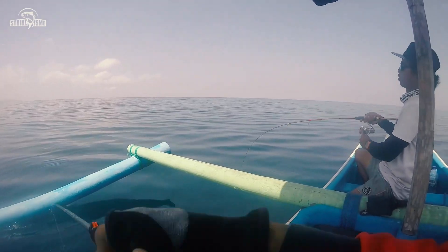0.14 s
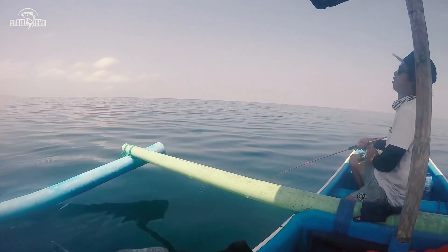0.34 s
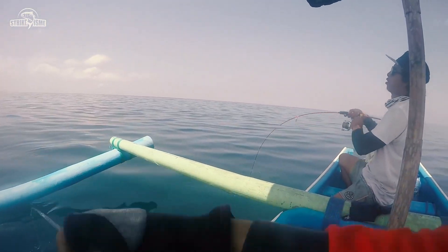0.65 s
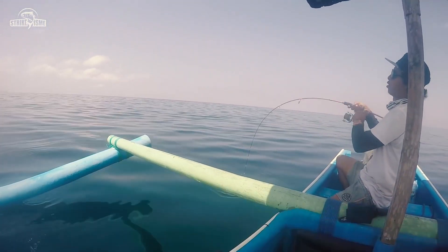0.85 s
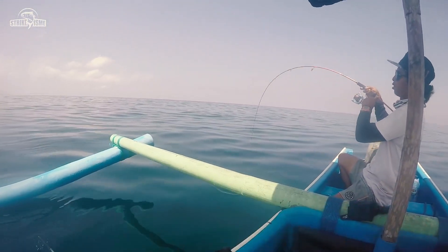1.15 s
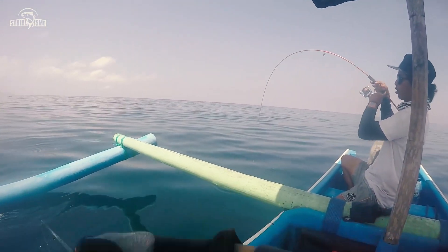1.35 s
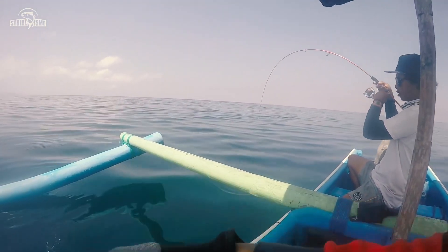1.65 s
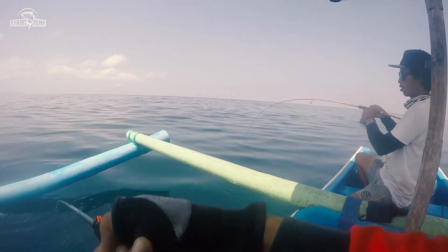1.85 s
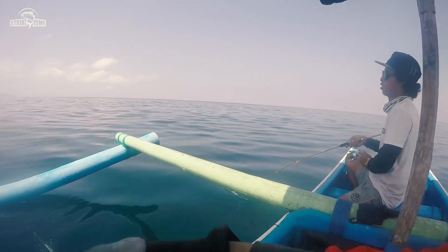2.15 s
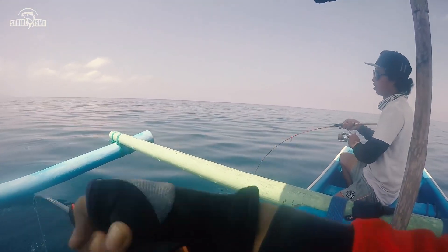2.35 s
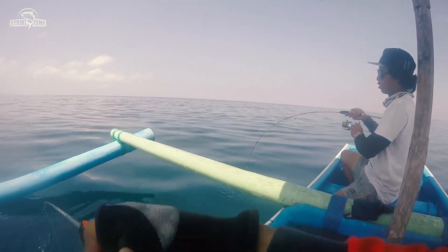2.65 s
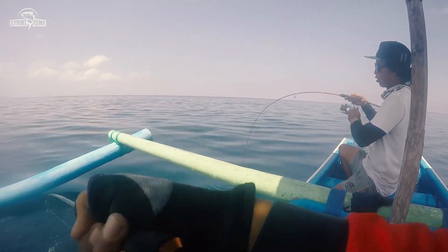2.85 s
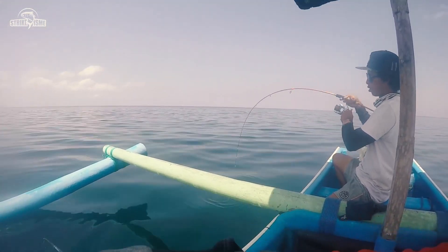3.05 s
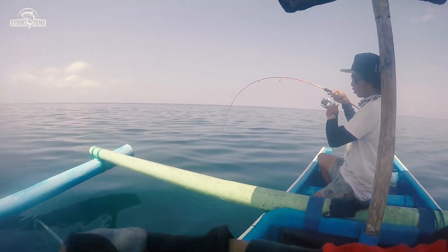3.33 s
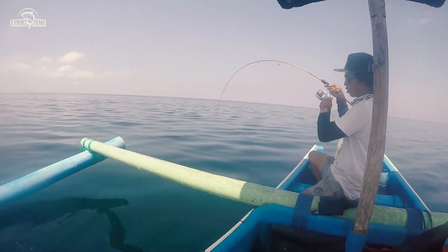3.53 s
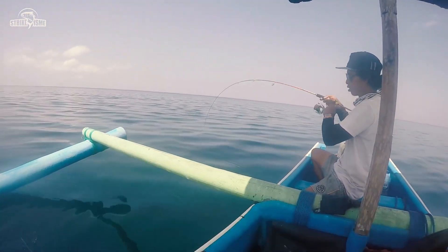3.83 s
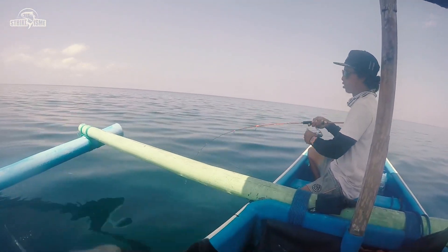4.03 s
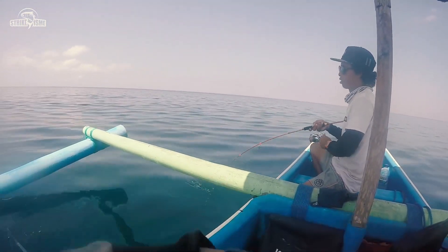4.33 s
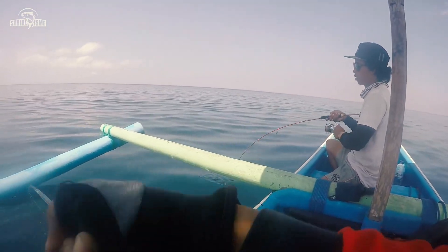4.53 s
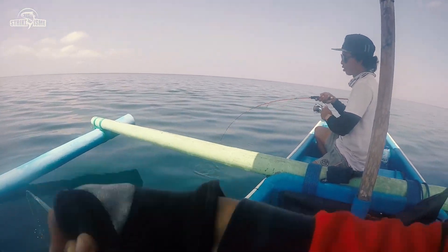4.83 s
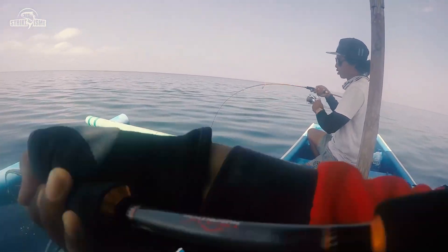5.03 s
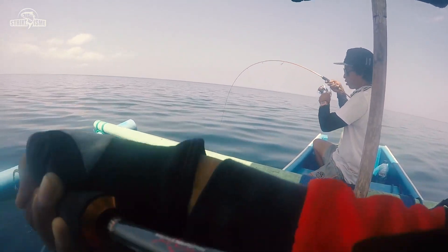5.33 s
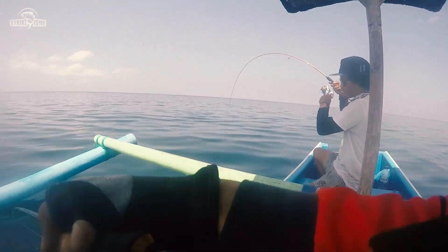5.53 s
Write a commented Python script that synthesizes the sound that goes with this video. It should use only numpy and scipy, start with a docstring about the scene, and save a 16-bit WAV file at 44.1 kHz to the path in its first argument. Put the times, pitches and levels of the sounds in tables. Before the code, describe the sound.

Close, rough outdoor sound from a boat: a reel's gears whine continuously in short cranked surges, labouring low then speeding up in pitch. Deep wind buffets the microphone over a soft sea bed. Wavelets froth and plop at the hull, mostly in the second half, with tiny high clicks and hiss of running line. At about 5.4 seconds a single sharp, woody knock with a deep thump and brief rattle ducks everything.

```python
"""A small outrigger boat on a calm sea, where an angler winds a spinning reel.
The gears whine as rough harmonics, surging with each rotor turn and each push of the crank.
Wind is slow and fast shaped noise; wavelets froth with ringing bubbles, and air pockets plop at the hull.
The reel's drag clicks in three runs of tiny pings with hissing line.
Late on, one hard knock rings the boat's modes, overloads the input and ducks the level."""
import sys
import numpy as np
from scipy import signal
from scipy.fft import rfft, irfft
from scipy.io import wavfile
from scipy.ndimage import uniform_filter1d

SR = 44100
rng = np.random.default_rng(int(sys.argv[2]) if len(sys.argv) > 2 else 0)


def persist_wave(psi):
    """Save psi, clipped to +-1, as 16-bit WAV."""
    counts = np.round(np.clip(psi, -1, 1) * 32767).astype(np.int16)
    wavfile.write(sys.argv[1], SR, np.atleast_2d(counts).T)


N = 250488
TIME = np.arange(N) / SR  # s

# Table levels are balances within each layer; the trims in its function finish the mix.
# Noise spectra are shapes only, each brought to rms 1 before its level is set.

# Harmonics of the gear mesh, from the first up: level_db
MESH_DB = [1.5, -13.5, -25, -40]
# How the reel's housing colours the whine: freq_hz, level_db
HOUSING = [(1800, 6.5), (2600, 1), (3300, 5.5), (3700, 0.5), (4200, -3), (4800, 2), (5300, -4.5),
           (6000, 3.5), (6600, 5.5), (7500, -1.5), (12000, -46)]
# Turns of the crank: mid_push_s, load_pitch_hz, after_push_pitch_hz, rotor_speed_hz,
# pitch_swing_share (per rotor turn), level_db, loudest_s (after mid-push)
CRANKS = [(-0.017, 2700, 2600, 22.4, 0.18, -35.5, 0.024), (0.291, 2910.0, 3070.0, 24.7, 0.16, -37.0, 0.008),
          (0.555, 2380.0, 2780.0, 22.6, 0.15, -37.5, -0.004), (0.832, 2150, 2980, 22, 0.14, -37.0, 0.004),
          (1.089, 2600.0, 3040.0, 24.2, 0.16, -34.5, 0.016),
          (1.392, 2870.0, 2950.0, 23.0, 0.15, -35.0, -0.004),
          (1.654, 2640.0, 3080.0, 23.9, 0.15, -37.5, 0.008),
          (1.916, 2450.0, 3160.0, 22.2, 0.16, -40.0, 0.008),
          (2.179, 2230.0, 3230.0, 22.7, 0.13, -38.0, 0.016),
          (2.448, 2130, 3090.0, 21.3, 0.16, -37.5, -0.004),
          (2.715, 2350.0, 3390.0, 23.5, 0.12, -39.5, 0.012),
          (2.969, 2330.0, 2950.0, 22.6, 0.18, -36.5, 0.028),
          (3.229, 2660.0, 3180.0, 23.9, 0.12, -36.5, 0.012),
          (3.493, 2150.0, 2870.0, 22.2, 0.16, -38.5, 0.016),
          (3.8, 2620.0, 3090.0, 25.0, 0.13, -37.5, -0.004),
          (4.029, 2270.0, 3190.0, 25.3, 0.15, -34.5, 0.02), (4.349, 2350, 3150, 22.4, 0.16, -36.5, -0.004),
          (4.613, 2060.0, 3170.0, 23.4, 0.12, -34.5, 0.004),
          (4.878, 2360.0, 2880.0, 22.6, 0.15, -36.0, -0.008),
          (5.16, 2220, 3050.0, 21.5, 0.13, -37.0, 0.008), (5.418, 2690.0, 2980.0, 23.2, 0.14, -39.5, 0.0),
          (5.703, 2060.0, 2810.0, 21.0, 0.17, -38.5, 0.008)]
# Rasp of the gear teeth and bearings: freq_hz, level_db_per_hz
RASP = [(1200, -32), (1850, -15), (2250, -3), (2700, 0), (3050, -3.5), (3600, -12), (4200, -19),
        (5500, -19), (7500, -23), (11000, -34)]
# Rumble of the large eddies: freq_hz, level_db_per_hz
RUMBLE = [(4, -36), (10, -11.5), (16, 2.5), (23, -7.5), (32, -11.5), (42, -18.5), (60, -38.5), (100, -50)]
# Buffeting at the microphone port: freq_hz, level_db_per_hz
BUFFET = [(35, -18), (60, 8), (80, 2), (120, -4), (180, -12), (260, -23), (450, -26), (1200, -34.5)]
# Slowly changing breeze at the microphone: time_s, rumble_db, buffet_db
BREEZE = [(0, -20, -38.5), (.6, -25.5, -45.5), (1.1, -27, -40.5), (2.1, -20.5, -41.5), (2.6, -25.5, -45.5),
          (3.2, -19.5, -40.5), (3.75, -22, -37.5), (4.2, -21.5, -40.5), (4.8, -17.5, -36.5),
          (5.25, -28.5, -38.5), (5.68, -21.5, -42)]
# Large slow eddies: peak_s, level_db, half_length_s
GUSTS = [(0.14, -19.5, 0.068), (0.438, -14.5, 0.11), (0.808, -14, 0.056), (1.018, -16, 0.021),
         (1.211, -17, 0.04), (1.585, -15, 0.03), (1.71, -16, 0.071), (2.131, -13.5, 0.026),
         (2.74, -17, 0.071), (3.349, -15, 0.046), (4.49, -16.5, 0.041), (4.708, -20, .08),
         (5.08, -17.5, 0.029)]
# Short puffs into the microphone port: peak_s, level_db
PUFFS = [(.43, -37), (.58, -35.5), (.85, -32), (1.0, -37), (1.221, -32), (1.385, -32.5), (1.645, -36),
         (1.86, -45), (2.415, -39), (2.705, -37), (2.99, -34.5), (3.22, -36), (3.3, -33.5), (3.43, -39),
         (3.8, -36.5), (3.911, -29), (4.03, -31), (4.2, -30.5), (4.87, -38), (5.15, -32.5), (5.36, -28)]
# Open sea all around: freq_hz, level_db_per_hz
SEA = [(100, 8.5), (300, 8.5), (700, 3), (1500, 3), (3000, -10), (5000, -3), (8000, -13.5), (11000, -17.5),
       (15000, -16)]
# Wavelets breaking on the hull: crest_s, level_db, length_s
LAPS = [(0.848, -42, 0.0099), (1.46, -46, .03), (1.652, -44, 0.022), (3, -42.5, 0.018), (3.089, -43, .008),
        (3.237, -35, 0.045), (3.391, -38, .03), (3.6, -42, .04), (3.708, -33.5, 0.037),
        (3.912, -31.5, 0.05), (4.037, -39.5, .02), (4.075, -41, 0.015), (4.176, -33, .032),
        (4.298, -39.5, 0.036), (4.52, -37.5, 0.017), (4.723, -40, 0.038), (4.897, -42, .04),
        (5.017, -35.5, 0.027), (5.168, -40, 0.038), (5.292, -33, 0.022), (5.319, -32, 0.0086)]
# Froth of the wavelets: freq_hz, level_db_per_hz
WASH = [(150, -24), (280, 3), (420, -25.5), (580, 0.5), (800, -0.5), (1050, 4.5), (1300, 1), (1520, -2.5),
        (1850, -4.5), (2600, -16.5), (4000, -10.5), (7000, -83), (14000, -38)]
# Spray of the wavelets: freq_hz, level_db_per_hz
SPRAY = [(1500, 2), (2500, 25), (4200, -22), (6000, -33), (10000, -12.5), (15000, -32)]
# The hull's answer to a wavelet: freq_hz, level_db_per_hz
THUD = [(40, -19), (65, 4), (125, 1), (180, -6), (260, -17), (450, -30)]
# Plops of water at the hull: start_s, level_db, starting_pitch_hz
PLOPS = [(0.436, -37, 1500), (0.448, -33, 1480), (0.844, -47, 402), (0.959, -31.5, 1070), (1.212, -35, 534),
         (1.432, -44.5, 414), (1.636, -53, 1079), (2.243, -31.5, 1430), (2.329, -39.5, 614),
         (2.597, -27.5, 1730), (3.09, -25.5, 553), (3.705, -30.5, 1070), (3.901, -21, 980),
         (4.174, -27, 1082), (4.313, -29, 1540), (4.519, -27.5, 616), (5.136, -28, 1832),
         (5.317, -29, 1340), (5.594, -33, 3170)]
# Line pulled against the drag: start_s, fastest_s, end_s, top_clicks_per_s, halving_s (of the rate), level_db
RUNS = [(0.635, 0.794, 1.77, 71, 0.19, -45.5), (2.332, 2.507, 3.45, 180, 0.07, -47.5),
        (4.442, 4.553, 5.26, 110, 0.07, -48)]
# Ring of the drag's pawl: pitch_hz, level_db
PAWL_MODES = [(8200, -3), (8800, -5), (10100, -8), (11600, -9), (13000, -12)]
# Hiss of the running line: freq_hz, level_db_per_hz
LINE_HISS = [(4000, -6), (7000, 8), (8700, -17), (10000, 17), (12000, -19), (15000, 11)]
# The knock and its rattling rebounds: start_s, force_db
KNOCKS = [(5.3811, -6.5), (5.3888, -36), (5.3925, -31), (5.3967, -29.5), (5.4016, -30.5)]
# Modes of the struck boat and the microphone's mount: pitch_hz, level_db, t60_s
BOAT_MODES = [(114.3, -14, 0.075), (220, -14, 0.05), (335, -1, 0.022), (539, 2.5, 0.033),
              (617.5, 0.5, 0.091), (661, 0.5, 0.062), (1037, 6, 0.025), (1100, 10, 0.017),
              (1195, 12.5, 0.014), (1683, -5.5, 0.05), (1833, 13.5, 0.011), (2130, -11.5, 0.061),
              (2830, 1.5, 0.018), (3940, -22, 0.042), (3840, -4, 0.055), (4390, -10, 0.043),
              (5160, -19, 0.031)]

COAST_HZ, COAST_DB = 2665, -48  # the whine between two pushes of the crank
LOAD_S, RUSH_S, EASE_S = .045, .048, .112  # slowest before mid-push, fastest after it, coasting either side
GRIP_S, GRIP_LEAD_S = .098, .013  # half length of the hand's drive, and its lead on mid-push
SPIN_UP_PER_S = 1.1  # share of speed the rotor gains per second through a push
PUSH_S, SURGE_DB = 0.079, 2.27  # half length of the loud part; level swing either way per rotor turn
RASP_DB, SEA_DB, RIPPLE_DB = -47.5, -51, -55  # middle levels; ripples are the water between wavelets
PUFF_S = 0.018  # half length of a puff
LAP_RISE, LAP_FALL = 0.92, 0.94  # build-up and run-off, as shares of a wavelet's length
EDGE_HZ = 15400  # upper band limit


def gain_of(db):
    """Decibels to amplitude."""
    return 10 ** (np.asarray(db) / 20)


def evened(x):
    """Scales to rms 1."""
    return x / np.sqrt(np.mean(x ** 2) + 1e-20)


def curve(rows, axis=1):
    """One column of a table, joined by straight lines in time."""
    rows = np.asarray(rows)
    return np.interp(TIME, rows[:, 0], rows[:, axis])


def add(mix, s, sound):
    """Mixes a sound in at time s."""
    part = mix[max(round(s * SR), 0):][:len(sound)]
    part += sound[:len(part)]


def coloured(x, points):
    """Gives x a spectrum at rms 1, falling 20 dB per octave outside the table."""
    hz, db = np.transpose(points)
    f = np.fft.rfftfreq(N, 1 / SR) + 1e-3
    octaves_outside = np.maximum(np.log2(f / hz[-1]), 0) + np.maximum(np.log2(hz[0] / f), 0)
    shape_db = np.interp(np.log(f), np.log(hz), db) - 20 * octaves_outside
    return evened(irfft(rfft(x) * gain_of(shape_db), N))


def noise(points):
    """Noise with a given spectrum."""
    return coloured(rng.standard_normal(N), points)


def wander(hz):
    """Slow chance movement up to about a given rate, rms 1."""
    f = np.fft.rfftfreq(N, 1 / SR)
    return evened(irfft(rfft(rng.standard_normal(N)) * np.exp(-(f / hz) ** 2), N))


def swell(s, half_s):
    """A smooth rise and fall of height 1 around time s."""
    return np.exp(-((TIME - s) / half_s) ** 2)


def gear_motion(coast_wobble=0.048, coast_flutter_db=2, push_db=-0.56):
    """Pitch and level of the mesh: each push labours, speeds up and coasts while the rotor swings it."""
    knots = []
    swing, wobble, pushing, power = np.zeros((4, N))
    for s, load_hz, rush_hz, rotor_hz, depth, db, accent_s in CRANKS:
        knots += [(s - EASE_S, COAST_HZ), (s - LOAD_S, load_hz)]
        knots += [(s + RUSH_S, rush_hz), (s + EASE_S, COAST_HZ)]
        near = abs(TIME - s) < 2 * EASE_S
        u = TIME[near] - s
        grip = np.exp(-((u + GRIP_LEAD_S) / GRIP_S) ** 4)
        rotor = grip * np.cos(2 * np.pi * rotor_hz * u * (1 + SPIN_UP_PER_S * u / 2))
        swing[near] += rotor
        wobble[near] += depth * rotor
        pushing[near] += grip
        power[near] += gain_of(db + push_db) ** 2 * np.exp(-2 * ((u - accent_s) / PUSH_S) ** 2)
    coasting = np.clip(1 - pushing, 0, 1)
    mean_hz = curve(sorted(knots))
    wobble = wobble + coast_wobble * coasting * wander(30.36)
    hz = mean_hz + np.maximum(mean_hz, COAST_HZ) * wobble  # the swing stays wide under load
    level_db = 10 * np.log10(power + gain_of(COAST_DB) ** 2)
    return hz, level_db + SURGE_DB * swing + coast_flutter_db * coasting * wander(53)


def reel(jitter=0.01698, flutter_db=6.0, whine_db=1, strain_db_per_octave=10, tooth_rough=0.22):
    """Uneven teeth roughen the harmonics, harsher under load; the boat echoes them and bearings rasp."""
    second_gear, second_db = 1.4, -18  # pitch ratio to the mesh, level
    echo_db, echo_t60, rasp_follow = -9, 0.055, 0.21
    hz, db = gear_motion()
    turns = np.cumsum(hz * (1 + jitter * wander(441))) / SR
    strain = np.log2(COAST_HZ / hz)  # octaves by which the load slows the gears
    whine = np.zeros(N)
    for k, level in enumerate(MESH_DB, 1):
        level = level + np.interp(k * hz, *np.transpose(HOUSING)) + flutter_db * np.tanh(wander(214))
        level = level + strain_db_per_octave * strain * (k > 1)
        # chance in strength and phase spreads fuzzy sidebands around each harmonic
        teeth = 1 + tooth_rough * k * (wander(500) + 1j * wander(500))
        whine += gain_of(level) * (teeth * np.exp(2j * np.pi * k * turns)).real
    # a weaker gear on the same drive flickers at random
    second_level = gain_of(second_db + np.tanh(wander(7.1))) * wander(250)
    whine += second_level * np.cos(2 * np.pi * second_gear * turns)
    whine = gain_of(db + whine_db) * evened(whine)
    t = TIME[:SR // 12]
    hits = (rng.random(len(t)) < 2000 / SR) * (t > .003)  # scattered reflections
    taps = rng.standard_normal(len(t)) * hits * gain_of(-60 * t / echo_t60)
    echo = signal.fftconvolve(whine, taps / np.linalg.norm(taps))[:N]
    rasp = noise(RASP) * gain_of(RASP_DB + rasp_follow * (db - db.mean()) + 3.0 * wander(54))
    return whine + gain_of(echo_db) * echo + rasp


def gusts(points, evenness):
    """Turbulence whose own chance swells are partly levelled."""
    x = noise(points)
    local_power = uniform_filter1d(x ** 2, SR // 12) + 1e-4
    return evened(x / local_power ** (evenness / 2))


def wind(rumble_db=2.0, gust_db=1.5, buffet_db=0.0, puff_db=2.5):
    """Slow large eddies rumble; smaller ones buffet the microphone port."""
    eddies = sum(gain_of(db + gust_db) * swell(s, half_s) for s, db, half_s in GUSTS)
    puffs = sum(gain_of(db + puff_db) * swell(s, PUFF_S) for s, db in PUFFS)
    rumble = gusts(RUMBLE, 0.22) * np.hypot(gain_of(curve(BREEZE) + rumble_db), eddies)
    buffet = gusts(BUFFET, 1.0) * np.hypot(gain_of(curve(BREEZE, axis=2) + buffet_db), puffs)
    return rumble + buffet


def open_sea():
    """The sea all around: a soft bed of shaped noise whose level drifts slowly."""
    return noise(SEA) * gain_of(SEA_DB + 1.0 * wander(3.5))


def lapping(splash_db=-13, splash_s=0.008):
    """Strength of water at the hull: wavelets build to a crest and run off; plops add small splashes."""
    power = gain_of(RIPPLE_DB + 1.9 * wander(22)) ** 2
    splashes = [(s + splash_s / 2, db + splash_db, splash_s) for s, db, hz in PLOPS]
    for s, db, length in list(LAPS) + splashes:
        u = (TIME - s) / length
        shape = np.exp(-np.maximum(-u / LAP_RISE, u / LAP_FALL))
        power = power + (gain_of(db) * shape) ** 2
    return np.sqrt(power)


def wash(wash_db=0.0, drops_per_s=1100, spread_db=2.5, drop_share=0.97, spray_per_s=1300):
    """Wavelets thud on the hull and break in spray and a froth of tiny, briefly ringing bubbles."""
    cycles, spray_db, thud_db = 6, -11, -0.5  # cycles in which a bubble fades 20 dB; levels
    bubbles, t = np.zeros(N), TIME[:SR // 25]
    pitches = np.geomspace(450, 4500, 24)
    for hz in pitches:
        births = rng.random(N) < drops_per_s / len(pitches) / SR
        births = births * gain_of(spread_db * np.minimum(rng.exponential(1, N), 3))
        ring = hz * np.sin(2 * np.pi * hz * t * (1 + 4 * t)) * gain_of(-20 * hz * t / cycles)
        bubbles += signal.oaconvolve(births, ring)[:N]
    froth = coloured(drop_share * evened(bubbles) + 0.3 * rng.standard_normal(N), WASH)
    spray = coloured(rng.standard_normal(N) * (rng.random(N) < spray_per_s / SR), SPRAY)
    thud = gusts(THUD, 0.72)
    return lapping() * (gain_of(wash_db) * froth + gain_of(spray_db) * spray + gain_of(thud_db) * thud)


def pings(rows, t60, rise, glide, grit, level_db):
    """Short rings, part clean tone and part fuzz, whose pitch climbs by the share glide per second."""
    out, t = np.zeros(N), TIME[:SR // 20]
    for s, db, hz in rows:
        lowpass = signal.butter(2, min(0.1 * hz, 1400), fs=SR)
        fuzz = evened(signal.lfilter(*lowpass, rng.standard_normal(len(t))))
        turn = 2 * np.pi * hz * (t + glide * t ** 2 / 2)
        ring = np.sin(turn) + grit * fuzz * np.cos(turn)
        envelope = (1 - np.exp(-t / rise)) * gain_of(-60 * t / t60)
        add(out, s, gain_of(db + level_db) * ring * envelope)
    return out


def plops():
    """Air pockets ring, rising in pitch, as water closes over them."""
    return pings(PLOPS, t60=0.039, rise=0.00047, glide=9.7, grit=0.68, level_db=-1.5)


def drag(unevenness=0.2, start_share=0.16, click_db=0.0, scatter_db=2.5, hiss_db=-19, idle_db=-74):
    """The spool spins up and slows; its pawl clicks with each notch and the running line hisses."""
    clicks, hiss = [], gain_of(idle_db)
    jitter = np.exp(unevenness * wander(27))
    for start, fastest, end, top_per_s, halve_s, db in RUNS:
        spin_up = np.interp(TIME, [start, fastest], [start_share, 1])
        slowing = 1 + np.maximum(TIME - fastest, 0) / halve_s
        speed = spin_up / slowing * (TIME > start) * (TIME < end)
        hiss = hiss + gain_of(db + hiss_db) * speed
        notches = np.floor(np.cumsum(top_per_s * speed * jitter) / SR)
        for i in np.flatnonzero(np.diff(notches)):
            force_db = db + rng.normal(0, scatter_db)
            for hz, mode_db in PAWL_MODES:
                ping_db = force_db + mode_db + rng.normal(0, scatter_db)
                clicks.append((i / SR, ping_db, hz * rng.uniform(1.0, 1.015)))
    ticking = pings(clicks, t60=0.0091, rise=0.00026, glide=0, grit=0.39, level_db=click_db)
    return hiss * noise(LINE_HISS) + ticking


def heave(start_hz=92, end_hz=20, sag=0.0118, t60=0.33, level_db=3):
    """The blow shoves the microphone: a deep thump that falls in pitch as it dies."""
    t = TIME[:SR // 3]
    turns = np.cumsum(end_hz + (start_hz - end_hz) * np.exp(-t / sag)) / SR
    return gain_of(level_db - 60 * t / t60) * np.sin(2 * np.pi * turns) * (1 - np.exp(-t / 0.00074))


def knock(ring_db=1, crack_db=-15, crack_t60=0.019, rattle_db=-22, push_s=0.00074, push_db=9):
    """A hard blow rings the boat's modes; the mount buzzes until it settles."""
    out, t = np.zeros(N), TIME[:SR // 3]
    ring = sum(gain_of(db + ring_db - 60 * t / t60) * np.sin(2 * np.pi * hz * t)
               for hz, db, t60 in BOAT_MODES)
    for s, force_db in KNOCKS:
        crack = evened(signal.lfilter([1], [1, -.92], rng.standard_normal(len(t))))
        crack = crack * gain_of(crack_db - 60 * t / crack_t60)
        add(out, s, gain_of(force_db) * (ring + crack) * (1 - np.exp(-t / 0.00059)))
    # the blunt contact itself is one short push at the start of the knock
    u = t / push_s
    push = gain_of(push_db) * u * (2 - u) * np.exp(-u)
    add(out, KNOCKS[0][0], heave() - push)
    # the buzz lasts from the first rebound to the last
    rattling = 1. * (TIME > KNOCKS[1][0]) * (TIME < KNOCKS[-1][0] + .002)
    rattling = uniform_filter1d(rattling, 150)
    buzz = noise([(1500, -5), (3200, -6), (3850, 10), (4500, -5), (5300, -12), (9000, -32)])
    return out + gain_of(rattle_db) * rattling * buzz


def scene():
    """Everything at the one microphone."""
    return (reel() + wind() + open_sea() + wash() + plops() + drag() + knock())[None]


def record(dry, threshold_db=-11, peak_fall_db_per_s=9, duck_share=0.47, lag=0.025):
    """The input saturates; gain control ducks just after loud peaks and recovers slowly; then a band limit."""
    clipped = dry[0] / (1 + dry[0] ** 8) ** (1 / 8)
    power_db = 10 * np.log10(abs(uniform_filter1d(clipped ** 2, 300)) + 1e-12)
    # the held peak level sinks steadily; a share of what is over the threshold is turned down
    fall = TIME * peak_fall_db_per_s
    held_db = np.maximum.accumulate(power_db + fall) - fall
    over_db = uniform_filter1d(np.maximum(held_db - threshold_db, 0), 500)
    ducked = clipped / gain_of(duck_share * np.interp(TIME - lag, TIME, over_db))
    lowpass = signal.firwin(511, EDGE_HZ, window=("kaiser", 9), fs=SR)
    return signal.oaconvolve(ducked, lowpass, "same")[None]


dry = scene()
out = record(dry)
persist_wave(out)
```